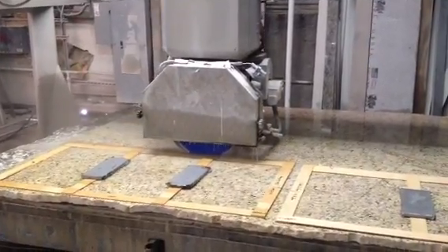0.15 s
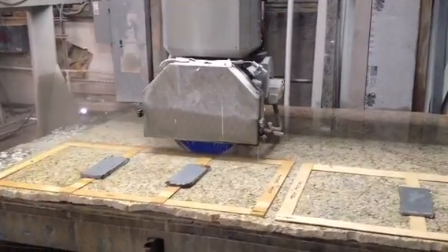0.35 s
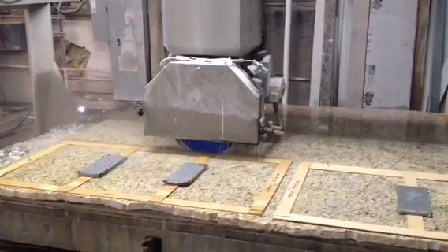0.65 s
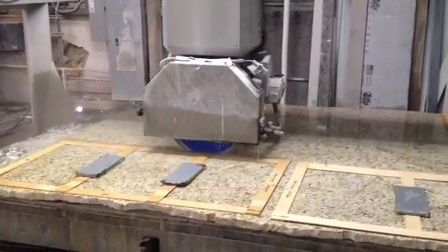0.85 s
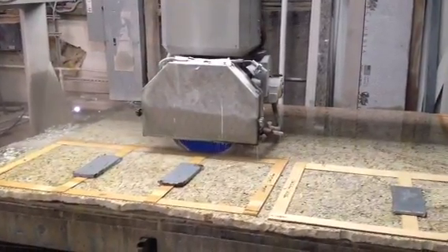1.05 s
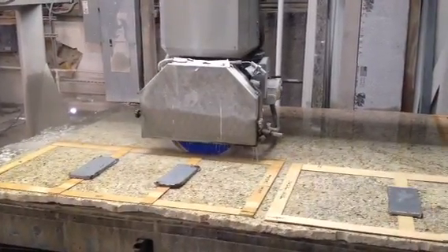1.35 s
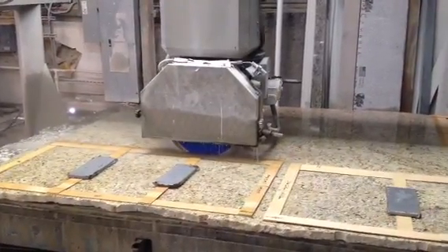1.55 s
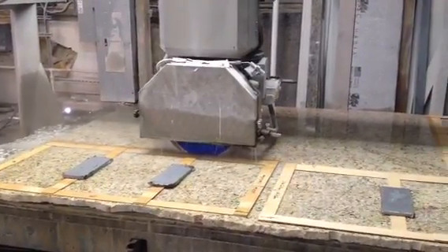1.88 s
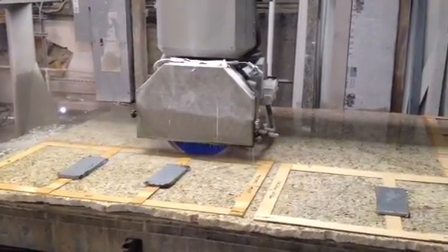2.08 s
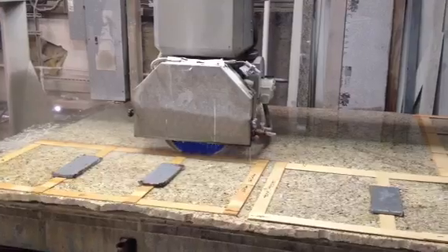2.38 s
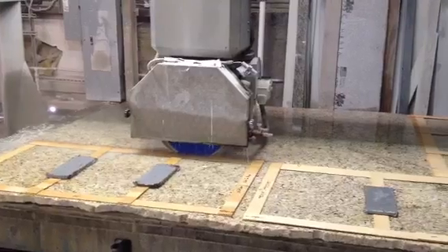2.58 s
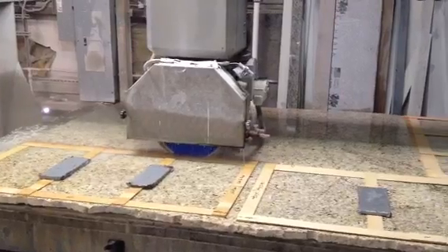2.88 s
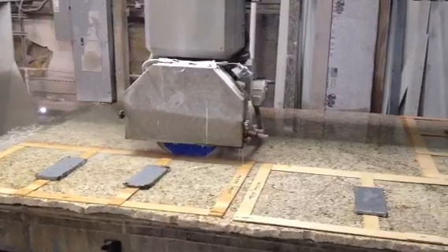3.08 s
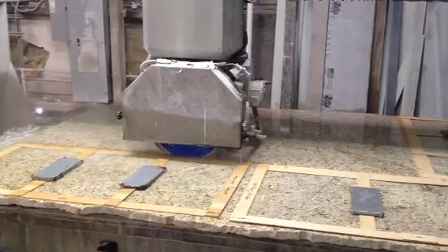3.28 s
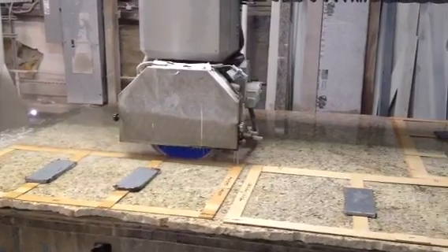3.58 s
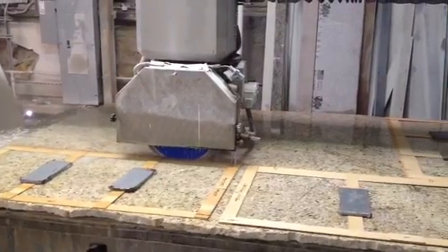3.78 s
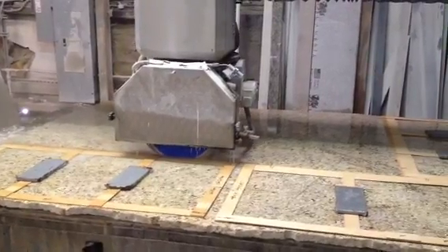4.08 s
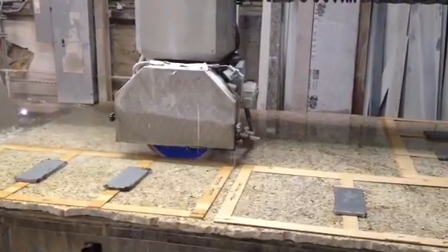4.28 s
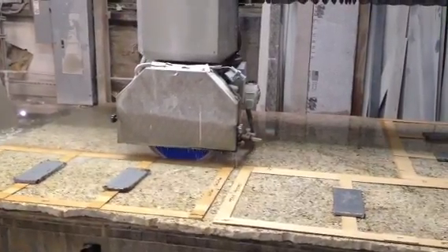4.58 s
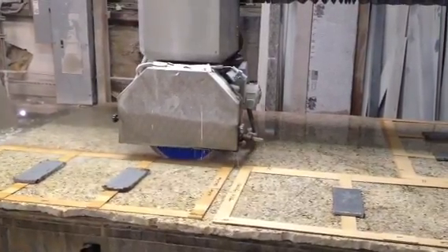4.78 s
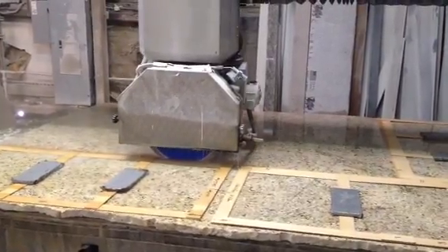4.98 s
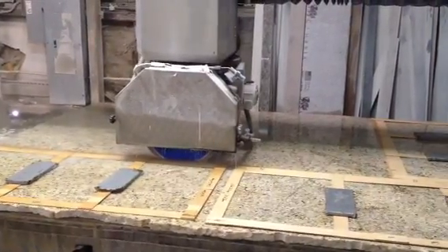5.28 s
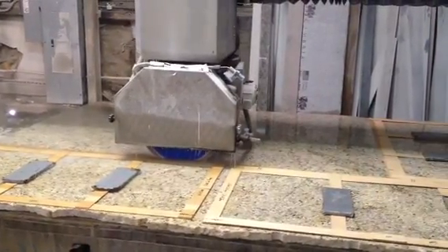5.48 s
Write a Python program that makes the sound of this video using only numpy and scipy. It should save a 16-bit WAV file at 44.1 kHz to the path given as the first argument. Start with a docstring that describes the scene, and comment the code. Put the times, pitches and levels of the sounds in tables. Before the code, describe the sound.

A large circular saw cuts a wet stone slab in an echoing workshop, heard from a few metres away. A loud, high grinding hiss runs without a break, mixed with the fine spray of cooling water. Beneath it, a metallic whine and a hum of many tones drift slowly in level, while a low drone builds over the first half and then holds.

```python
"""In an echoing workshop, a bridge saw cuts a wet stone slab a few metres from a phone.
Diamond grit chips the stone and excites the modes of the steel blade: a loud, high hiss over the spray
of cooling water. The same bumps recur on every turn, so drone, hum and whine are harmonics of the
spindle's rotation; their levels drift by interference as the head travels through the room's echoes.
Beneath them lie the booming of the blade guard, a faint pump and a wash of reverberation."""
import sys
import numpy as np
from scipy import signal
from scipy.fft import rfft, irfft, next_fast_len
from scipy.io import wavfile
from scipy.ndimage import uniform_filter1d

SR = 44100
rng = np.random.default_rng(int(sys.argv[2]) if len(sys.argv) > 2 else 0)


def waveform_to_disk(signal):
    """Save audio, clipped to [-1, 1], as 16-bit WAV at the path in sys.argv[1]."""
    frames = np.transpose(np.atleast_2d(signal))
    scaled = np.clip(frames, -1, 1) * 32767
    samples = np.round(scaled).astype(np.int16)
    wavfile.write(sys.argv[1], SR, samples)


N = 249164
TIME = np.arange(N) / SR
SPINDLE_HZ = 29.898

# Hum of guard and slab. Each row: harmonic number, relative level in dB.
HUM_HARMONICS = [(6, -62), (7, -61), (10, -59), (16, -55), (17, -55), (18, -55), (19, -49.5), (20, -53),
                 (21, -56), (22, -58), (26, -52.5), (27, -52.5), (29, -52.5), (30, -55), (31, -51),
                 (32, -56.5), (33, -51.5), (34, -54), (35, -58.5), (36, -61)]
# Whine of the blade. Each row: harmonic number, relative level in dB.
WHINE_HARMONICS = [(42, -54.5), (53, -52.0), (58, -55.0), (61, -53.5), (62, -49.5), (63, -51.5),
                   (65, -54.0), (66, -55.5), (68, -50.5), (69, -54.5), (70, -50.5), (71, -47.5),
                   (75, -46.5), (76, -50.5), (79, -50.5), (82, -47.5), (83, -45.5), (87, -51.5),
                   (89, -51.0), (91, -52.0), (98, -55.0)]
# Harmonics that stand out. Each row: harmonic number, first level in dB, crest level in dB,
# start, rise and hold in seconds, fade in dB per second.
SWELLING_HARMONICS = [(9, -47, -46, 0, 0.46, 1.3, 1), (23, -50, -49, 0, 0.36, 0.53, 1),
                      (24, -49, -44, 0.2, 3, 2.6, -5), (28, -44.5, -38.4, 1.73, 0.32, .4, 1.0),
                      (56, -49.5, -46.5, 0.14, .6, 2, 4.5), (67, -51, -42.5, 1, 1.4, 2.1, 8),
                      (72, -47, -44.5, 0.54, 1.4, .7, 1.5), (80, -46, -44.5, 0.57, 1, 1.6, 9),
                      (81, -54, -41, 0.95, .8, 0.75, 0.8)]


def amp(db):
    """Decibels as an amplitude ratio."""
    return 10 ** (np.asarray(db) / 20)


def unit(x):
    """Normalisation to rms 1."""
    return x / np.sqrt(np.mean(x ** 2))


def level_at(spectrum, hz):
    """Level of a spectrum in dB, interpolated over log frequency."""
    points_hz, db = np.transpose(spectrum)
    return np.interp(np.log(np.maximum(hz, 1)), np.log(points_hz), db)


def colour(source, spectrum):
    """Source and filter: impose a spectrum, rolling off below its first point; rms 1."""
    size = next_fast_len(N)
    hz = np.fft.rfftfreq(size, 1 / SR)
    gain = amp(level_at(spectrum, hz)) * np.minimum(hz / spectrum[0][0], 1) ** 2
    return unit(irfft(rfft(source, size) * gain, size)[:N])


def wander(rate):
    """Smooth random modulation that changes about rate times a second; rms 1."""
    span = int(SR / rate)
    steps = np.repeat(rng.standard_normal(512), span)[:N + 2 * span]
    smooth = uniform_filter1d(uniform_filter1d(steps, span), span // 2)
    return unit(smooth[span:span + N])


def sine(hz):
    """A pure tone of random phase; rms 1."""
    return np.sqrt(2) * np.sin(2 * np.pi * (hz * TIME + rng.random()))


def harmonics(orders, db, drift, rate, echoes=8, size=16384):
    """Multipath interference: spindle harmonics arrive directly and by echoes that come and go; rms 1."""
    place_in_turn = (SPINDLE_HZ * TIME % 1) * size
    out = 0
    for path in range(echoes + 1):
        lines = np.zeros(size // 2 + 1, complex)
        lines[np.rint(orders).astype(int)] = amp(db) * np.exp(2j * np.pi * rng.random(len(orders)))
        wave = np.interp(place_in_turn, np.arange(size), irfft(lines))
        out = out + wave * (drift * wander(rate) / np.sqrt(echoes) if path else 1)
    return unit(out)


def impacts(per_second, spread_db):
    """Shot noise: dense random clicks of uneven size and either sign."""
    hit = rng.random(N) < per_second / SR
    return hit * np.sign(rng.standard_normal(N)) * amp(spread_db * rng.standard_normal(N))


def resonant_tones():
    """Resonance: harmonics that meet a mode of blade or guard swell, hold and waver; most then fade."""
    out = 0
    for order, first_db, crest_db, start, rise, hold, fade in SWELLING_HARMONICS:
        db = np.interp(TIME, [start, start + rise], [first_db, crest_db])
        db -= fade * np.maximum(TIME - (start + rise + hold), 0)
        out = out + sine(round(order) * SPINDLE_HZ) * amp(db + .8 * wander(5))
    return out


def blade_whine(bite_db):
    """Periodic forcing: the rim strikes alike on each turn, and harmonics near the blade's modes sing."""
    return harmonics(*np.transpose(WHINE_HARMONICS), drift=.42, rate=2.19) * amp(-37.5 + 1.1 * bite_db)


def blade_buzz(grind_db):
    """A dense harmonic series: the weaker multiples of the turn above the hum merge into a buzz."""
    # Spectral envelope. Each row: frequency in Hz, relative level of a harmonic in dB.
    envelope = [(1100, -64), (1450, -57), (1900, -56.5), (2500, -60), (3300, -58.5), (4000, -52.5),
                (5000, -45.5), (6700, -38.5), (7600, -45.5), (9500, -51.5)]
    orders = np.arange(HUM_HARMONICS[-1][0] + 1, int(envelope[-1][0] / SPINDLE_HZ))
    orders = np.setdiff1d(orders, [round(row[0]) for row in WHINE_HARMONICS + SWELLING_HARMONICS])
    scatter_db = 11 * (rng.random(512)[:len(orders)] - .5)
    db = level_at(envelope, orders * SPINDLE_HZ) + scatter_db
    return harmonics(orders, db, drift=.89, rate=3.5) * amp(grind_db - 7)


def blade_ring(grind_db):
    """Modal vibration: two thin tones of the steel disc come and go inside the hiss."""
    # Each row: frequency in Hz, level relative to the grinding in dB.
    modes = [(6159, -22), (6727, -21)]
    return sum(sine(hz) * amp(grind_db + db + 2 * wander(4.8)) for hz, db in modes)


def grinding(grind_db, rasp_db):
    """Impact excitation: diamond grains chip the stone and set the blade ringing."""
    # The uneven rim modulates the bite. Each row: cycles per turn, rms depth in dB.
    runout = [(1, .28), (3, .33), (4, .28), (5, .24), (9, .15)]
    # Three spectra. Each row: frequency in Hz, relative spectral density in dB.
    steel_spectrum = [(3000, -38), (4100, -26.5), (4700, -13.5), (5400, -7), (6200, -1.5), (6750, -0.5),
                      (7150, -1.5), (7850, -6.5), (8650, -5.5), (9600, -12), (11000, -19), (15000, -30)]  # the blade ringing under the grit
    stone_spectrum = [(2000, -16), (3300, -16.5), (4000, -1.5), (4700, 2), (5400, 4), (7000, -20),
                      (10000, -34)]  # stone crumbling in the kerf
    screech_spectrum = [(5500, -42), (6450, -13), (6700, -0.5), (7000, -0.5), (7300, -5), (8500, -38),
                        (12000, -60)]  # the blade's strongest cluster of modes
    runout_db = sum(depth_db * sine(order * SPINDLE_HZ) for order, depth_db in runout)
    force = amp(runout_db + .45 * wander(28))
    steel = colour(impacts(per_second=20000, spread_db=4) * force, steel_spectrum) * amp(grind_db - 1.52)
    stone = colour(impacts(per_second=18000, spread_db=6) * force, stone_spectrum) * amp(rasp_db)
    flare = amp(1.5 * wander(45))  # hard crystals cause short surges
    screech = colour(rng.standard_normal(N) * flare, screech_spectrum) * amp(grind_db - 7)
    return steel + stone + screech


def water_spray(spray_db):
    """Droplet impact noise: cooling water flung off the rim bursts on the guard in uneven spurts."""
    # Each row: frequency in Hz, relative spectral density in dB.
    spectrum = [(3000, -25.5), (8000, 2), (10500, 1), (12250, 2.5), (13100, 0), (14100, -0.5),
                (14800, -4.5), (15300, -7)]
    spurts = amp(.45 * wander(26))
    drops = impacts(per_second=22000, spread_db=3.5) * spurts
    return colour(drops, spectrum) * amp(spray_db)


def spindle_drone(bite_db):
    """Rotational harmonics: the spindle's low drone builds up, then holds, varying with the bite."""
    # Each row: harmonic number, relative level in dB.
    partials = [(3, -29), (4, -27), (5, -17), (8, 0), (11, -9), (12, -19), (13, -10), (14, -18),
                (15, -13.5), (25, -11)]
    rise_db_per_s, full_at_s = 2.6, 2.9
    db = -35.3 - rise_db_per_s * np.maximum(full_at_s - TIME, 0) + .69 * bite_db
    return harmonics(*np.transpose(partials), drift=.12, rate=1.5) * amp(db)


def guard_and_slab_hum(bite_db):
    """Forced vibration: guard and slab hum at spindle harmonics, louder as the blade bites harder."""
    return harmonics(*np.transpose(HUM_HARMONICS), drift=.31, rate=1.8) * amp(-42 + bite_db)


def guard_boom():
    """Noise-driven resonance: a low mode of the guard murmurs throughout and wells up four times."""
    # Each row: frequency in Hz, relative spectral density in dB.
    resonance = [(170, -38), (202, -18), (212, -1), (221, -14), (260, -42), (600, -70)]
    # Each row: time of the crest in seconds, half length in seconds, level in dB.
    crests = [(.62, 0.075, -45), (1.3, 0.14, -51.5), (1.79, .14, -51), (2.18, 0.11, -55.5)]
    swells = sum(amp(db) * np.exp(-((TIME - at) / half) ** 2) for at, half, db in crests)
    return colour(rng.standard_normal(N), resonance) * (amp(-62) + swells)


def pump():
    """Amplitude modulation: the pump's faint, low tone wavers in level."""
    return sine(hz=126) * amp(-67 + 1.4 * wander(4.2))


def room_wash(rasp_db):
    """Diffuse reverberation: walls smear motor, water and cut into noise that partly follows the rasp."""
    # Each row: frequency in Hz, relative spectral density in dB.
    spectrum = [(25, -41), (60, -33), (115, -17), (200, -1.5), (350, -6.5), (520, -7.5), (850, 3),
                (1130, -6.5), (1280, 1), (1450, -4), (1950, 3), (2450, 4), (3200, -4.5), (6000, -32)]
    swell_db = .5 * (rasp_db - rasp_db.mean()) + .77 * wander(12)
    return colour(rng.standard_normal(N), spectrum) * amp(swell_db - 37)


def scene():
    """Superposition: all sources sound throughout, most following the bite, alike in both channels."""
    # The blade meets harder and softer stone. Each row: time in seconds, grinding level in dB.
    cut_levels = [(0.0, -16.7), (0.52, -15.6), (0.64, -17.0), (1.24, -16), (1.52, -16.5), (1.6, -16.5),
                  (2.16, -16.5), (2.48, -16), (3.04, -16), (3.12, -16.5), (3.36, -17.5), (3.68, -17),
                  (3.76, -16.5), (4.32, -16), (4.68, -14.9), (4.88, -17), (5.0, -16.5), (5.6, -17.5)]
    flutter_db = .28 * wander(21)  # hard and soft grains
    grind_db = np.interp(TIME, *np.transpose(cut_levels)) + flutter_db
    bite_db = grind_db - grind_db.mean()
    # Spray and rasp fade slowly as the head moves on.
    spray_db = grind_db - 8 - .33 * TIME
    rasp_db = grind_db - 17 - .17 * TIME
    blade = resonant_tones() + blade_whine(bite_db) + blade_buzz(grind_db) + blade_ring(grind_db)
    cut = grinding(grind_db, rasp_db) + water_spray(spray_db)
    machine = spindle_drone(bite_db) + guard_and_slab_hum(bite_db) + guard_boom() + pump()
    mono = blade + cut + machine + room_wash(rasp_db)
    return np.array([mono, mono])


def record(dry):
    """Band limiting: the phone's steep low-pass filter removes the highest treble."""
    cutoff_hz = 15250
    return signal.sosfilt(signal.ellip(12, .1, 90, cutoff_hz, fs=SR, output="sos"), dry)


dry = scene()
out = record(dry)
waveform_to_disk(out)
```